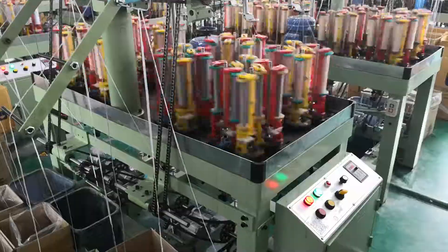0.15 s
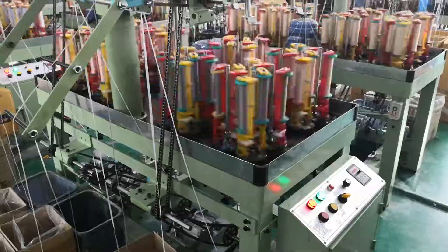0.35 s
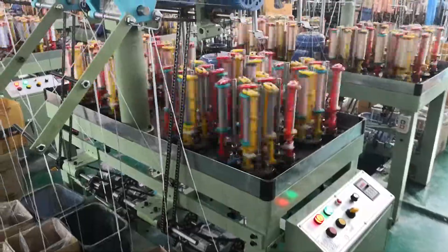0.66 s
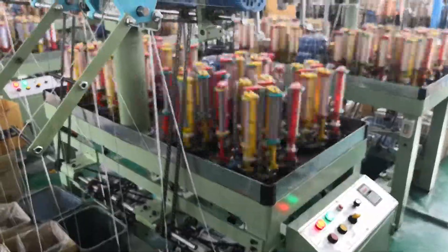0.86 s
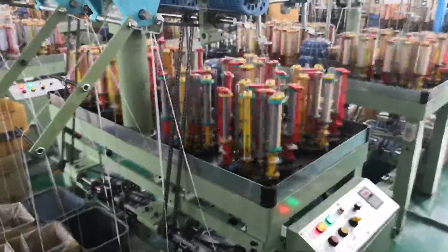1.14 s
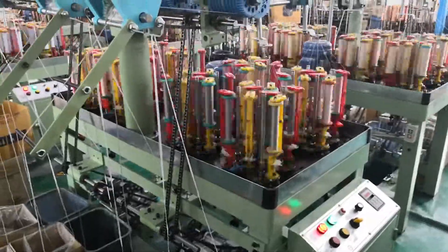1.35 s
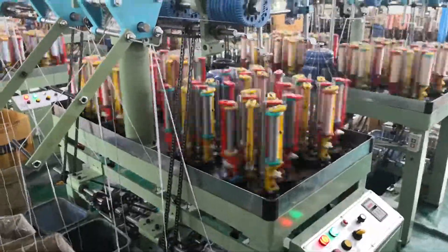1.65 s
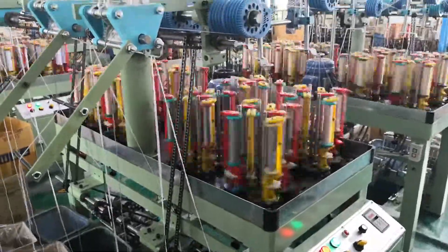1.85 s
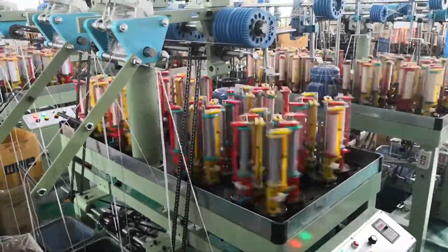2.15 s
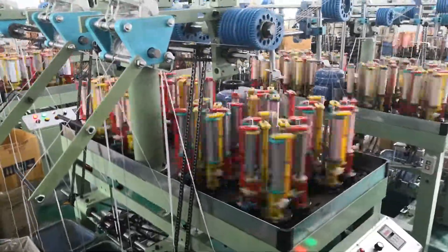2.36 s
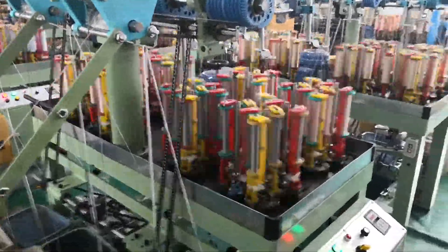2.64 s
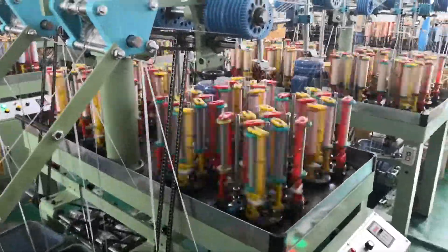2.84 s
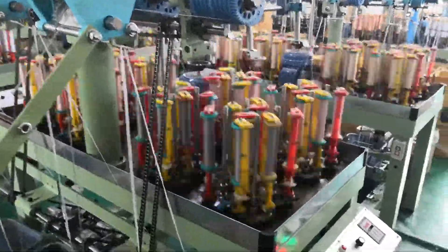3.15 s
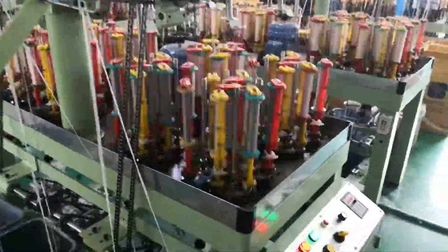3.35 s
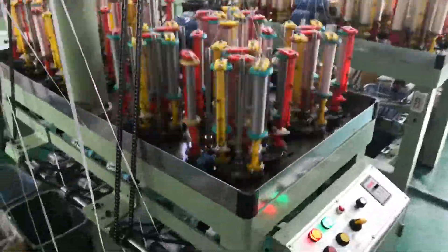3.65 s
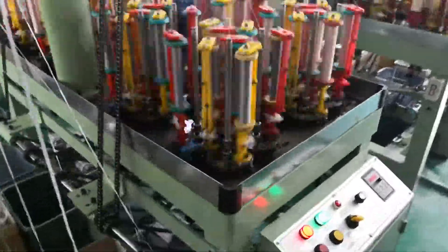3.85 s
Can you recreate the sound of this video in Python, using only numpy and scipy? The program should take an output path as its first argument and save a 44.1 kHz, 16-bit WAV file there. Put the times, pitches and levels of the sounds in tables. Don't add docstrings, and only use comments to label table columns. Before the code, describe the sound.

Braiding machines roar steadily on a factory floor, dense clatter over low rumble and wavering hum.

```python
import sys
import numpy as np
from scipy import signal
from scipy.fft import rfft, irfft
from scipy.io import wavfile
from scipy.ndimage import uniform_filter1d, minimum_filter1d

SR = 44100
rng = np.random.default_rng(int(sys.argv[2]) if len(sys.argv) > 2 else 0)


def unload_wav(signal):
    wavfile.write(
        sys.argv[1],
        SR,
        np.round(np.clip(np.atleast_2d(signal).T, -1, 1) * 32767).astype(np.int16),
    )


def gain_from_decibels(decibels):
    exponent = np.asarray(decibels, float) / 20
    return 10 ** exponent


N = 176400


def rms_one(x):
    return x / np.sqrt(np.mean(x ** 2) + 1e-20)


def in_time(rows):
    s, *columns = np.transpose(rows)
    return [np.interp(np.arange(N) / SR, s, column) for column in columns]


def at_hz(points, hz):
    table_hz, table_db = np.transpose(points)
    return np.interp(np.log(hz), np.log(table_hz), table_db)


def drift(rate_hz):
    hop, settle = 40, 2000
    r = np.exp(-2 * np.pi * rate_hz * hop / SR)
    noise = rng.standard_normal(N // hop + settle + 2)
    slow = signal.lfilter([1], [1, -2 * r, r * r], noise)[settle:]
    return np.interp(np.arange(N) / hop, np.arange(len(slow)), rms_one(slow))


def pair(mid, side, alike):
    alike = np.clip(alike, -.99, .99)
    return np.sqrt(1 + alike) * mid + np.sqrt(1 - alike) * side * [[1], [-1]]


def spaced_coherence(hz):
    near = 1 / (1 + (hz / 400) ** 5.5)
    first_hz, period_hz, fade_hz = 1330, 1950, 12000
    comb = np.cos(2 * np.pi * (hz - first_hz) / period_hz)
    end_on = .33 * np.exp(-hz / fade_hz) * comb
    return near + (1 - near) * end_on


# (frequency [Hz], left minus right [dB])
PORT_DIFFERENCE = [(400, 0), (2300, -0.5), (3600, -0.5), (5000, -1.5), (6300, -2.5), (7400, 3.5),
                   (8200, 2.5), (10000, -10.5)]


def clatter(spectrum, per_s, sway_db):
    size_spread_db = 2
    hall_db = 4
    sizes = gain_from_decibels(size_spread_db * rng.exponential(1, (2, N))) * rng.choice([-1, 1], (2, N))
    near_hits = rms_one(sizes * (rng.random((2, N)) < per_s / SR))
    far_hits = gain_from_decibels(hall_db) * rng.standard_normal((2, N))
    sway = gain_from_decibels(sway_db * (drift(2.2) + drift(31.0)))
    hits = (near_hits + far_hits) * sway

    hz = np.arange(1, N // 2 + 2) * SR / N
    low_hz, high_hz = spectrum[0][0], spectrum[-1][0]
    octaves_outside = np.maximum(np.log2(low_hz / hz), np.log2(hz / high_hz))
    edge_db = -24 * np.maximum(0, octaves_outside)
    mid, side = rfft(hits) * gain_from_decibels(at_hz(spectrum, hz) + edge_db)
    ports = gain_from_decibels(at_hz(PORT_DIFFERENCE, hz) * [[.5], [-.5]])
    return rms_one(irfft(pair(mid, side, spaced_coherence(hz)) * ports, N))


# (frequency [Hz], spectral level [dB per Hz])
KNOCK_SPECTRUM = [(450, -29.5), (650, -7.5), (1000, -8.5), (1400, -7.5), (1700, -3), (2400, -0.5),
                  (3300, -7.5), (5200, -10)]


def carrier_knocks():
    return gain_from_decibels(-13) * clatter(KNOCK_SPECTRUM, per_s=9000, sway_db=-0.36)


# (frequency [Hz], spectral level [dB per Hz])
TICK_SPECTRUM = [(3300, -6.5), (4700, -6), (5600, 0.5), (6300, -1.5), (7300, 1.5), (8300, -9), (11500, -42),
                 (15300, -37)]


def latch_ticks():
    return gain_from_decibels(-17) * clatter(TICK_SPECTRUM, per_s=14000, sway_db=0.14)


# (time [s], level [dB])
ROAR_LEVEL = [
    (0.4, -16),
    (1.16, -15.5),
    (2.32, -16),
    (2.34, -14.5),
    (2.49, -16),
    (2.77, -14.5),
    (3.28, -16.5),
    (3.47, -13.5),
    (3.64, -16),
    (4.0, -14),
]


def roar():
    (level_db,) = in_time(ROAR_LEVEL)
    return gain_from_decibels(level_db - level_db.mean()) * (carrier_knocks() + latch_ticks())


# (frequency [Hz], spectral level [dB per Hz])
RUMBLE_SPECTRUM = [(25, -30), (60, -9), (125, -12.5), (160, 2), (300, 1.5), (420, -1.5), (540, -8.5),
                   (650, -21)]
# (time [s], level [dB])
GEAR_LOAD = [
    (.4, -28.5),
    (.8, -27.5),
    (1.36, -26.5),
    (1.75, -29),
    (2.3, -30),
    (2.9, -27),
    (3.4, -28.5),
    (4.0, -27),
]


def gear_rumble():
    (load_db,) = in_time(GEAR_LOAD)
    level = gain_from_decibels(-23 + load_db - load_db.mean())
    return level * clatter(RUMBLE_SPECTRUM, per_s=3000, sway_db=1.0)


# (time [s], frequency [Hz], level [dB])
FRAME_HUM = [(0.4, 170.7, -26), (1.11, 172.2, -30), (1.25, 165.5, -64), (1.37, 175.7, -31.5),
             (1.75, 173.0, -24), (2.15, 172.9, -35), (2.4, 166.2, -40), (2.52, 169.5, -31),
             (3.24, 173.4, -26), (3.25, 172.4, -62), (3.41, 178.6, -28), (3.58, 167, -40),
             (3.67, 166.1, -47), (3.72, 167.4, -24), (3.78, 173.6, -30), (4.0, 170.4, -28)]


def hum():
    hz, db = in_time(FRAME_HUM)
    phase = 2 * np.pi * np.cumsum(hz) / SR
    return np.sqrt(2) * gain_from_decibels(db + drift(24.0)) * np.sin(phase)


# (frequency [Hz], bandwidth [Hz], level [dB], left-right correlation [0-1])
MESH_WHINES = [
    (96, 8, -47, .98),
    (116, 7, -43, .98),
    (153, 10, -40, .98),
    (212, 10, -41, .95),
    (399, 8, -37, .6),
    (800.5, 7, -35, .75),
    (819, 8, -39.5, .65),
    (810, 110, -35, .55),
]


def whines():
    out = 0
    for hz, width_hz, db, alike in MESH_WHINES:
        r = np.exp(-np.pi * width_hz / SR)
        poles = [1, -2 * r * np.cos(2 * np.pi * hz / SR), r * r]
        tone = rng.standard_normal((2, N + SR))
        for _ in range(2):
            tone = signal.lfilter([1, 0, -1], poles, tone)
        settled = tone[:, SR:]
        out = out + gain_from_decibels(db) * pair(*rms_one(settled), alike)
    return out


def scene():
    return roar() + gear_rumble() + hum() + whines()


def roll_off(x):
    return signal.sosfilt(signal.butter(12, 15840, fs=SR, output="sos"), x)


def record(dry):
    start_s, rise_s = .3682, .0003
    opening_db, settle_s = 4, .008
    since = np.arange(N) / SR - start_s
    settling = gain_from_decibels(opening_db * np.exp(-np.maximum(since, 0) / settle_s))
    x = dry * np.clip(since / rise_s, 0, 1) * settling

    limit, span = .9, int(.002 * SR)
    gain = limit / np.maximum(np.abs(x).max(axis=0), limit)
    x = x * uniform_filter1d(minimum_filter1d(gain, 2 * span), span)

    top_cut = signal.ellip(10, .5, 75, 15050, fs=SR, output="sos")
    x = signal.sosfilt(top_cut, x)
    return roll_off(x)


dry = scene()
out = record(dry)
unload_wav(out)
```